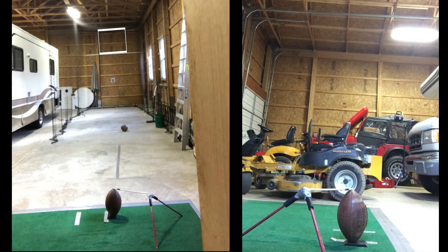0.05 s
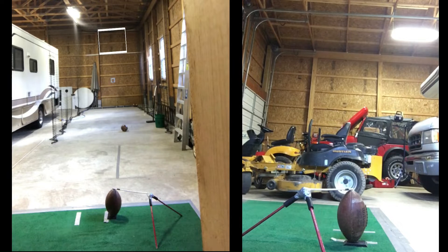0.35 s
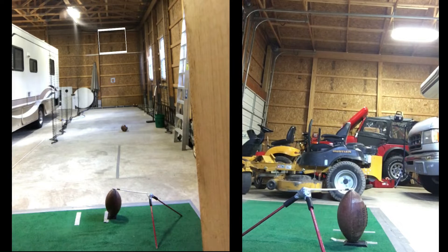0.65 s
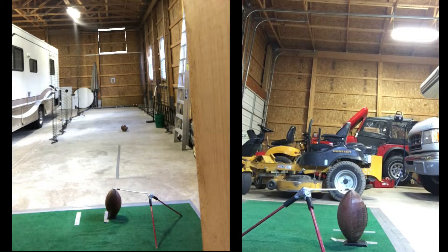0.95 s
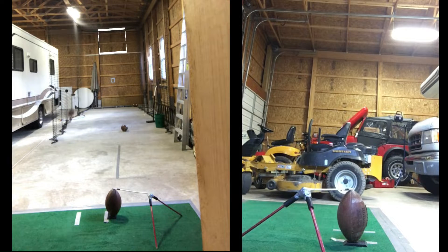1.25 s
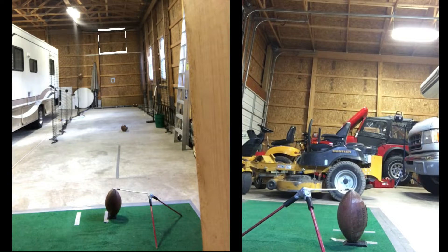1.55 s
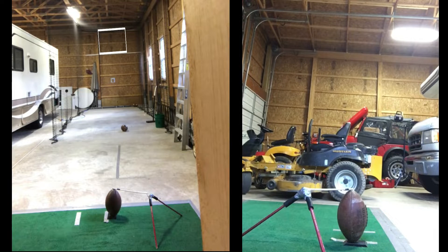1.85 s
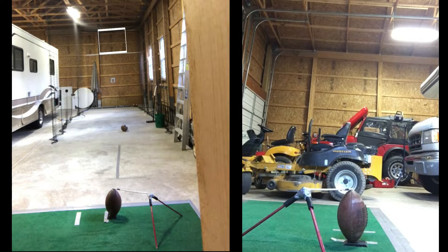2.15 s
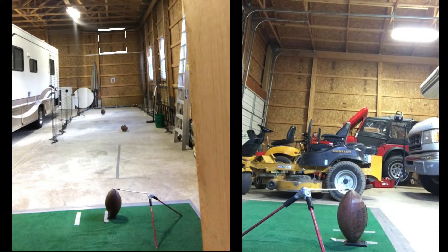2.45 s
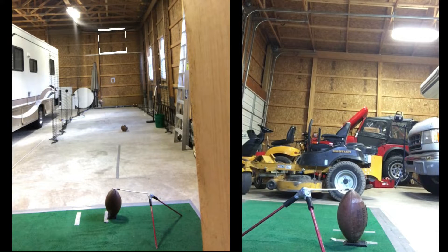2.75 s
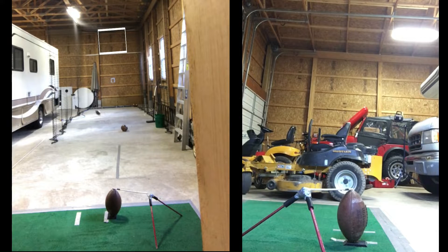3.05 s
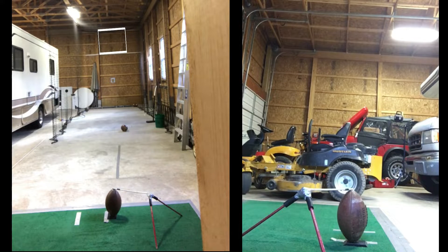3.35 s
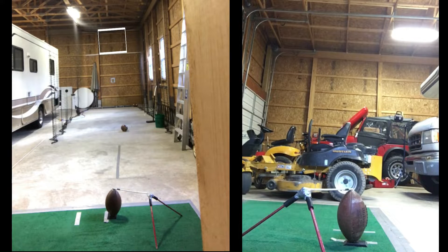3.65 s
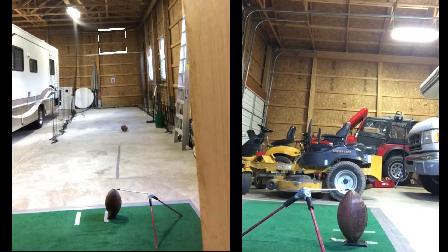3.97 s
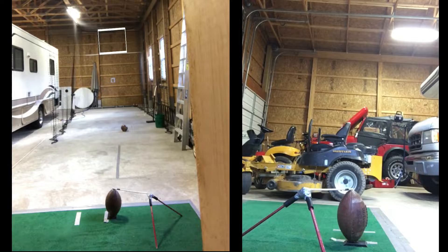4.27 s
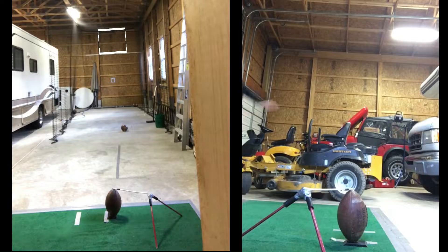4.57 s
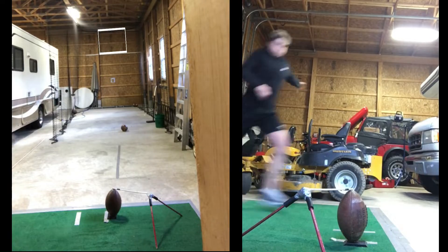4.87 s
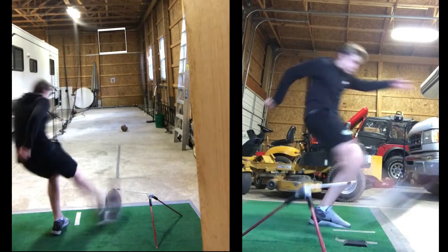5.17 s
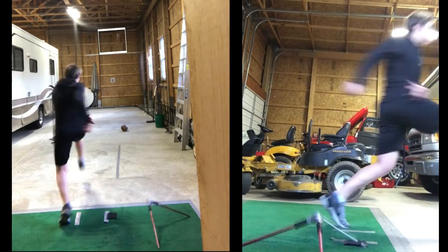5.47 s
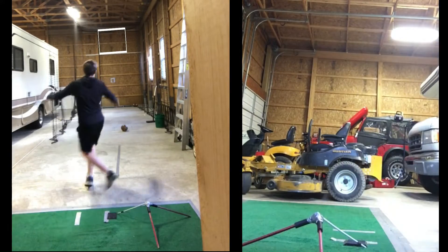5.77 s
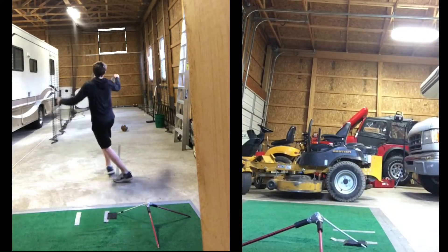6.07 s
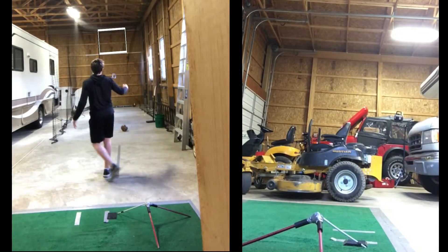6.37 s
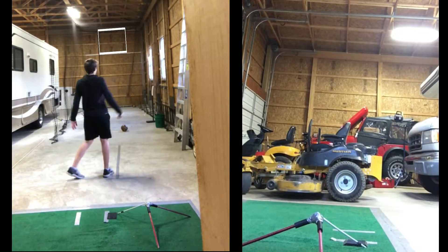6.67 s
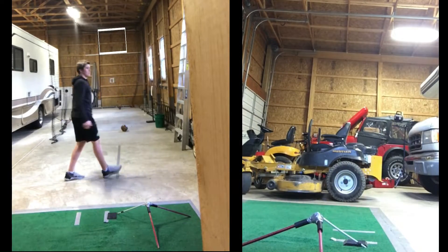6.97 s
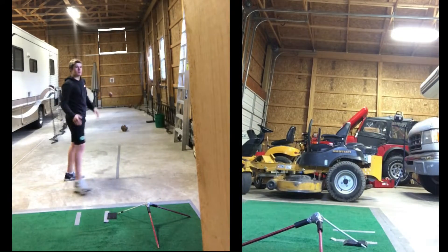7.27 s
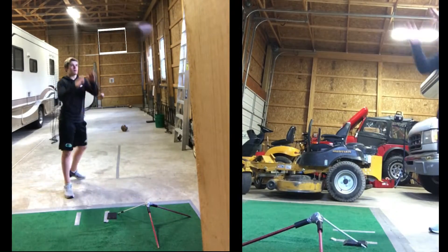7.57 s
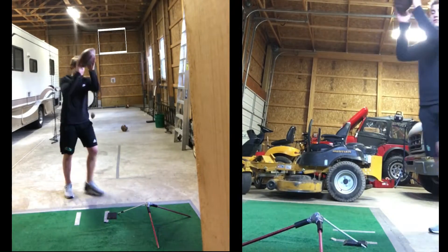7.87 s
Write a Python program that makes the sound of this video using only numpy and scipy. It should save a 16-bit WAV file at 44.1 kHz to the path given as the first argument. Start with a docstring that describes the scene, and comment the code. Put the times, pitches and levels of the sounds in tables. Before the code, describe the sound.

A football bounces on concrete, then a run-up and a booming kick, followed by scuffing steps echoing in a large barn.

```python
"""A football in a large timber barn with a concrete floor. Shoes step, scuff and squeak; the ball bounces
hard twice: skin slaps, shell thumps, the air inside pings. The ball holder clatters over. A run-up,
a foot skids on the turf mat, and the kick sets off a deep boom. More scuffs and heavy steps follow,
and the ball drops back to the floor. Every blow rolls round the barn, over steady ventilation rumble."""
import sys
import numpy as np
from scipy import signal
from scipy.fft import rfft, irfft, next_fast_len
from scipy.io import wavfile
from scipy.ndimage import uniform_filter1d

SR = 44100
rng = np.random.default_rng(int(sys.argv[2]) if len(sys.argv) > 2 else 0)


def transcribe(signal):
    """Save signal, clipped to [-1, 1], as a 16-bit WAV file at the path in sys.argv[1]."""
    frames = np.atleast_2d(signal).T
    limited = np.clip(frames, -1, 1)
    pcm = np.round(limited * 32767).astype(np.int16)
    wavfile.write(sys.argv[1], SR, pcm)


N = 349713

# blows on the ball: (time [s], slap [dB], slap tilt [dB/oct], slap cutoff [Hz], thump [dB],
# thump pitch [Hz], thump decay [s], pock [dB], pock pitch [Hz], air ring [dB], room send [dB])
BALL_BLOWS = [(1.3407, -23, 1, 16000, -19, 163, 0.0031, -37, 1140, -45.5, 7.5),
              (2.539, -27.5, 1.7, 17000, -25, 149.4, 0.0043, -48, 1240, -49, 7.5),
              (5.3069, -18.5, 0.5, 6000, -3, 176.3, 0.0039, -22.5, 1130, -37.5, -1.5),
              (6.9254, -34, -16, 6200, -22, 175.4, 0.0043, -32, 1090, -50, 3)]
# air modes inside the ball: (frequency [Hz], relative level [dB], T60 [s])
BALL_MODES = [(1025, 13, 0.091), (1210, 19, 0.14), (1360, 24, 0.11), (1510, 15, 0.074), (2250, 9, 0.12),
              (2630, 14, .13), (2770, -18, 0.069), (3650, -17, .08), (4300, 33, 0.078)]
# skin slap: (frequency [Hz], relative density [dB])
SLAP_SPECTRUM = [(40, -32), (150, -20), (350, 8.5), (700, -12.5), (1300, 1), (2000, -3), (3200, -6.5),
                 (4800, -10.5), (6200, -10), (8500, -19), (16000, -35.5)]
# steps and holder knocks: (time [s], tap [dB], tap tilt [dB/oct], contact decay [s], clop pitch [Hz],
# thud [dB], thud pitch [Hz], room send [dB])
KNOCK_HITS = [(.239, -48, -4.5, 0.0046, 1270, -40.5, 198, -0.5),
              (.741, -46.5, -0.5, .011, 645, -49, 293, -0.5),
              (3.2141, -37, -2, 0.0024, 860, -37.5, 423, 4.5),
              (3.636, -52, -6, 0.0066, 1510, -46.5, 151, 8),
              (4.3023, -41, -2.5, 0.0052, 3180, -54, 253, -1),
              (4.743, -45.5, -2, 0.0066, 1370, -52, 200, -1),
              (5.150, -57.5, 0.5, 0.0047, 1500, -53, 150, 13), (5.214, -54, -2, 0.0044, 1410, -58, 150, 9),
              (5.6328, -38.5, 1.5, 0.0052, 5170, -24.5, 200, 1),
              (5.685, -26, -0.5, 0.0021, 3440, -50, 404, -8), (5.6885, -32, 2, 0.011, 1300, -63, 310, 5),
              (6.260, -37, 0.5, 0.019, 1350, -56, 300, 2.5), (6.487, -38, -8, 0.017, 1125, -44, 394, -7),
              (6.918, -36.5, 4, 0.0077, 3000, -54, 200, 6),
              (7.1876, -37.5, 0.5, 0.0017, 1480, -47, 167, 10.5),
              (7.203, -41.5, 1.5, .0041, 2430, -31, 167, 2), (7.526, -39, -0.5, 0.012, 3500, -65, 253, 0.5)]
# contact tap: (frequency [Hz], relative density [dB])
TAP_SPECTRUM = [(60, -4), (300, 3), (700, -6.5), (1300, -2.5), (2200, -5), (3300, -6.5), (4800, -7.5),
                (6200, -6.5), (9500, -18.5), (16000, -30.5)]
# standing foot's skid: (frequency [Hz], relative density [dB])
SKID_SPECTRUM = [(80, -46), (250, -2), (400, 7.5), (600, -4), (1150, -1.5), (1520, 4.5), (1900, -8.5),
                 (3300, -8), (4800, -17), (6000, -13.5), (8000, -31), (16000, -29)]
# shoe and cloth strokes: (peak time [s], rise [s], level [dB], tilt [dB/oct])
SCUFF_STROKES = [(0.383, 0.023, -60, 4), (.555, 0.01, -52, 0.5), (0.614, 0.034, -54, 6),
                 (0.721, 0.03, -55.5, 4), (.872, 0.015, -61, 3.5), (1.58, 0.11, -48, 2.5),
                 (1.80, 0.058, -52.5, 3.5), (1.99, 0.055, -58, 3.5), (3.69, 0.03, -54, -9),
                 (3.89, 0.12, -53.5, -3), (4.342, .013, -54, 4), (5.006, .012, -48, 6.5),
                 (5.47, 0.17, -45.5, -2), (5.88, 0.043, -36, -0.5), (5.99, 0.076, -42.5, -0.5),
                 (6.23, 0.016, -48, 2), (6.325, .048, -38.5, -2), (6.48, 0.093, -43, -4),
                 (6.70, 0.062, -45, -1), (6.81, 0.056, -40.5, -0.5), (7.742, 0.013, -64, 9)]
# sliding friction: (frequency [Hz], relative density [dB])
RUB_SPECTRUM = [(60, -13), (350, -1), (700, -5), (1100, 2.5), (1700, 1), (2500, -3), (3700, -8),
                (4900, -12), (6200, -9.5), (10000, -23), (12000, -25.5), (16000, -32.5)]
# sole catching on concrete: (time [s], level [dB])
SOLE_CATCHES = [(0.593, -49.5), (.695, -55)]
# booms of the kick and heaviest footfalls: (time [s], level [dB])
BOOM_HITS = [(5.308, -24.5), (6.441, -43), (6.699, -42)]
# building's boom: (frequency [Hz], relative density [dB])
BOOM_SPECTRUM = [(22, -44), (36, -5.5), (50, -8), (72, -9), (110, -13), (300, -61)]
# first wall echoes: (delay [s], gain before barn colour [dB])
WALL_ECHOES = [(.0025, -20.5), (.0115, -15.5), (.013, -17.5), (.036, -23.5), (.054, -25.5)]
# barn decay: (frequency [Hz], T60 [s])
BARN_DECAY = [(80, 1.62), (180, 1.04), (500, 1.205), (1400, 1.087), (3500, 1.07), (6000, 0.67),
              (10000, 0.51), (16000, 0.57)]
# barn colour: (frequency [Hz], gain [dB])
BARN_EQ = [(40, -15), (100, 1), (180, -0.5), (400, 3.5), (1200, 1), (3500, -2), (7000, -4.5),
           (14000, -10.5)]
# ventilation rumble: (frequency [Hz], relative density [dB])
VENT_SPECTRUM = [(15, -75.5), (25, -27), (55, -1.5), (97, -6.5), (157, -1.5), (212, -4.5), (242, -4),
                 (344, -9), (394, -12.5), (545, -17), (775, -27), (2690, -41.5), (3920, -41.5), (4870, -45),
                 (16000, -57.5)]


def ball(overtone_ratio=2.6, overtone_db=-16, flex_delay_s=0.0005, scrape_db=-4, scrape_s=0.0058):
    """The skin slaps and pocks, the whole ball flexes with a thump, the air inside pings."""
    out, t = np.zeros(N), np.arange(SR // 3) / SR
    ring = sum(amp(db) * np.exp(-np.log(1000) * t / t60_s) * np.sin(2 * np.pi * hz * t)
               for hz, db, t60_s in BALL_MODES)
    for (at_s, slap_db, tilt_db_oct, cutoff_hz, thump_db, thump_hz, thump_s,
         pock_db, pock_hz, ring_db, room_db) in BALL_BLOWS:
        soften = signal.butter(3, cutoff_hz, fs=SR, output="sos")  # softer contact, duller slap
        slap = signal.sosfilt(soften, click(SLAP_SPECTRUM, tilt_db_oct))
        blow = sized(ring, ring_db)
        add(blow, 0, sized(slap, slap_db))
        add(blow, 0, sized(thump(pock_hz, 1.23 / pock_hz), pock_db))
        add(blow, flex_delay_s, sized(thump(thump_hz, thump_s), thump_db))
        overtone = thump(thump_hz * overtone_ratio, thump_s / 2)
        add(blow, flex_delay_s, sized(overtone, thump_db + overtone_db))
        add(out, at_s, blow)
        add(out, at_s, amp(room_db) * barn(blow))
        # pebbled skin scrapes while squashed
        slips = grit(len(t), spread_db=4) * np.exp(-t / scrape_s)
        add(out, at_s, sized(signal.fftconvolve(slips, slap), slap_db + scrape_db))
    return out


def knocks(tick_db=4, tick_s=0.0077, clop_db=-2.5, clop_db_oct=-4, clop_cycles=0.35, thud_cycles=0.31):
    """Shoes and holder strike: a contact tick and crunch, a hollow clop, the thud of the weight."""
    near, send, t = np.zeros(N), np.zeros(N), np.arange(SR // 8) / SR
    for at_s, tap_db, tilt_db_oct, contact_s, clop_hz, thud_db, thud_hz, room_db in KNOCK_HITS:
        tap = click(TAP_SPECTRUM, tilt_db_oct)
        # longer contact: softer start, less tick
        press = np.exp(-t / contact_s) * (1 - np.exp(-4 * t / contact_s))
        contact = sized(grit(len(t), spread_db=4) * press, 0)
        add(contact, 0, sized(np.ones(1), tick_db) * np.exp(-contact_s / tick_s))
        hollow_db = clop_db + clop_db_oct * np.log2(clop_hz / 1000)  # smaller hollows are weaker
        clop = sized(thump(clop_hz, clop_cycles / clop_hz), tap_db + hollow_db)
        thud = sized(thump(thud_hz, thud_cycles / thud_hz), thud_db)
        body = clop + thud
        add(near, at_s, body)
        add(near, at_s, sized(signal.fftconvolve(contact, tap), tap_db))
        # the barn blurs the crunch into one smooth blow
        add(send, at_s, amp(room_db) * body)
        add(send, at_s, sized(tap, tap_db + room_db))
    return near + barn(send)[:N]


def planted_foot(at_s=5.2805, skid_db=-19, bite_db=5.5, bite_after_s=0.0126, bite_s=0.0024, room_db=-8):
    """The standing foot skids on the turf mat just before the kick, gripping hardest midway."""
    t = np.arange(N) / SR - at_s
    bite = np.exp(-((t - bite_after_s) / bite_s) ** 2)
    slide = envelope(at_s, attack_s=0.0041, hold_s=0.019, release_s=0.0099)
    skid = noise(SKID_SPECTRUM) * amp(skid_db + bite_db * bite) * slide
    return skid + amp(room_db) * barn(skid)[:N]


def scuffs(clump_db=1.0, fall_ratio=1.18, room_db=-0.5):
    """Soles and cloth slide: grainy friction that catches in clumps, swelling and fading per stroke."""
    near, t = np.zeros(N), np.arange(-SR // 3, SR // 3) / SR
    for peak_s, rise_s, db, tilt_db_oct in SCUFF_STROKES:
        clumps = amp(clump_db * unit_rms(uniform_filter1d(rng.standard_normal(len(t)), size=220)))
        slips = clumps * grit(len(t), spread_db=2)
        rub = unit_rms(signal.fftconvolve(slips, click(RUB_SPECTRUM, tilt_db_oct))[:len(t)])
        stroke = np.exp(-0.5 * (t / np.where(t < 0, rise_s, fall_ratio * rise_s)) ** 2)
        add(near, peak_s + t[0], amp(db) * rub * stroke)
    return near + amp(room_db) * barn(near)[:N]


def squeaks(hz=3650, width_ratio=0.18, room_db=-7):
    """Rubber sticks and slips on concrete: brief narrow-band noise."""
    band = [(hz / 2, -50), (hz * (1 - width_ratio), -14), (hz, 0),
            (hz * (1 + width_ratio), -14), (hz * 2, -50)]
    catches = sum(amp(db) * envelope(at_s, attack_s=0.0078, hold_s=0.029, release_s=0.014)
                  for at_s, db in SOLE_CATCHES)
    chirps = noise(band) * catches
    return chirps + amp(room_db) * barn(chirps)[:N]


def booms(push_hz=66, push_s=0.0096, push_db=9.5, attack_s=0.0057, hold_s=0.036, linger_db=-14.5):
    """A heavy blow shoves the air; the building answers with a short deep boom that lingers faintly."""
    power, push = np.zeros(N), np.zeros(N)
    for at_s, db in BOOM_HITS:
        add(push, at_s, sized(thump(push_hz, push_s), db + push_db))
        burst = envelope(at_s, attack_s, hold_s, release_s=0.045)
        linger = amp(linger_db) * envelope(at_s, attack_s, hold_s, release_s=0.86)
        power += amp(db) ** 2 * (burst ** 2 + linger ** 2)
    return push + noise(BOOM_SPECTRUM) * np.sqrt(power)


def barn(x, build_s=0.00054, cluster_s=0.056, cluster_width_s=0.0017, cluster_db=-4, patch_db=3.5):
    """Reverberation of x: wall echoes, then a dense, lumpy tail whose treble dies first."""
    size = 3 * SR // 2
    hz, t, bands = signal.stft(rng.standard_normal(size), SR, nperseg=256)
    # many overlapping paths even out the bands
    power = abs(bands) ** 2
    bands /= np.sqrt(uniform_filter1d(power, size=15, axis=1) / np.mean(power) + 1e-9)
    # posts and parked machines scatter short waves into patches
    patches = unit_rms(uniform_filter1d(rng.standard_normal(bands.shape), size=14, axis=1))
    bands *= amp(patch_db * patches * (hz / (hz + 400))[:, None])
    # far wall and roof echoes return together
    cluster = amp(cluster_db) * np.exp(-((t - cluster_s) / cluster_width_s) ** 2)
    swell = 1 - np.exp(-t / build_s) + cluster
    decay = np.exp(-np.log(1000) * t / lookup(BARN_DECAY, hz)[:, None])
    response = signal.istft(bands * swell * decay, SR, nperseg=256)[1] * np.sqrt(10.5 / SR)
    for delay_s, db in WALL_ECHOES:
        add(response, delay_s, amp([db]))
    colour = amp(lookup(BARN_EQ, np.fft.rfftfreq(2 * SR, 1 / SR)))
    response = irfft(rfft(response, 2 * SR) * colour)[:size]
    return signal.fftconvolve(x, response)


def ventilation(rumble_db=-44.5, hum_hz=67, hum_db=-54, waver_rad=1.13):
    """Steady ventilation rumble with a wavering low hum."""
    waver = noise([(0, 0), (3, 0), (12, -40), (60, -120)])
    hum = np.sqrt(2) * np.sin(2 * np.pi * hum_hz * np.arange(N) / SR + waver_rad * waver)
    return amp(rumble_db) * noise(VENT_SPECTRUM) + amp(hum_db) * hum


def thump(hz, decay_s):
    """A push that swells and dies within a few cycles, moving no net air."""
    t = np.arange(SR // 8) / SR
    swell = np.sqrt(t / decay_s) * np.exp(-t / decay_s)
    swing = np.sin(2 * np.pi * hz * t)
    return swell * (swing - np.average(swing, weights=swell))


def click(spectrum, tilt_db_oct, size=4096):
    """Minimum-phase pulse with this spectrum, tilted about 2 kHz."""
    hz = abs(np.fft.fftfreq(size, 1 / SR))
    octaves = np.log2(np.maximum(hz, 500) / 2000)
    log_gain = np.log(amp(lookup(spectrum, hz) + tilt_db_oct * octaves))
    return np.fft.ifft(np.exp(np.conj(signal.hilbert(log_gain)))).real[:size // 2]


def grit(size, spread_db):
    """Dense run of tiny uneven slips."""
    grains = rng.standard_normal(size)
    grain_db = spread_db * np.repeat(rng.standard_normal(size // 32 + 1), 32)[:size]
    return grains * amp(grain_db)


def noise(spectrum):
    """Steady noise with this spectrum, rms 1."""
    size = next_fast_len(N)
    gain = amp(lookup(spectrum, np.fft.rfftfreq(size, 1 / SR)))
    return unit_rms(irfft(rfft(rng.standard_normal(size)) * gain, size)[:N])


def envelope(start_s, attack_s, hold_s, release_s):
    """Linear rise; exponential decay from hold_s after the start."""
    t = np.arange(N) / SR - start_s
    return np.clip(t / attack_s, 0, 1) * np.exp(-np.maximum(t - hold_s, 0) / release_s)


def amp(db):
    """Decibels to gain."""
    return 10 ** (np.asarray(db) / 20)


def unit_rms(x):
    """Scales to rms 1."""
    return x / np.sqrt(np.mean(x ** 2) + 1e-20)


def sized(x, db):
    """Scales to the energy of 10 ms at this level."""
    return amp(db) * x / np.sqrt(np.sum(x ** 2) * 100 / SR + 1e-20)


def lookup(table, hz):
    """Interpolates over log frequency."""
    table_hz, values = np.transpose(table)
    return np.interp(np.log(hz + 1), np.log(table_hz + 1), values)


def add(mix, at_s, sound):
    """Mixes a sound in, in place."""
    part = mix[max(round(at_s * SR), 0):][:len(sound)]
    part += sound[:len(part)]


def scene():
    """All sources at one microphone on the floor behind the ball."""
    return (ball() + knocks() + scuffs() + squeaks() + planted_foot() + ventilation() + booms())[None]


def record(dry, low_hz=30, high_hz=16200):
    """Microphone bass cut, soft peak clipping, band limit."""
    heard = signal.sosfilt(signal.butter(2, low_hz, "highpass", fs=SR, output="sos"), dry)
    clipped = 0.95 * heard / (1 + abs(heard) ** 6) ** (1 / 6)
    lowpass = signal.firwin(511, high_hz, window=("kaiser", 9), fs=SR)
    return signal.oaconvolve(clipped, lowpass[None], "same")


dry = scene()
out = record(dry)
transcribe(out)
```